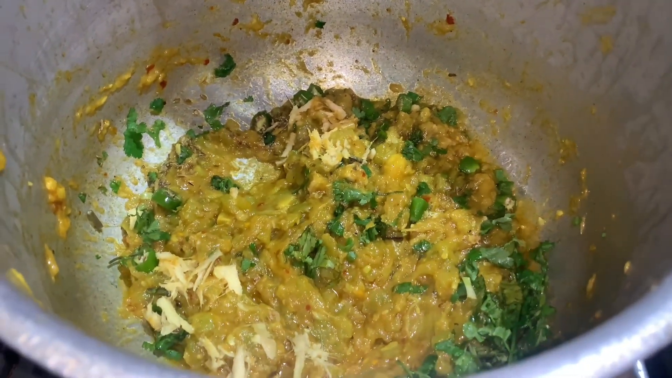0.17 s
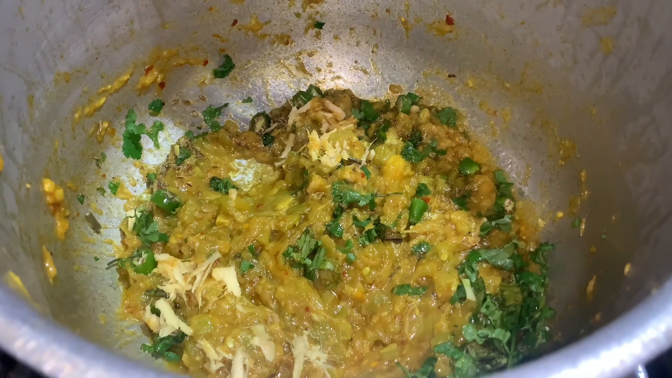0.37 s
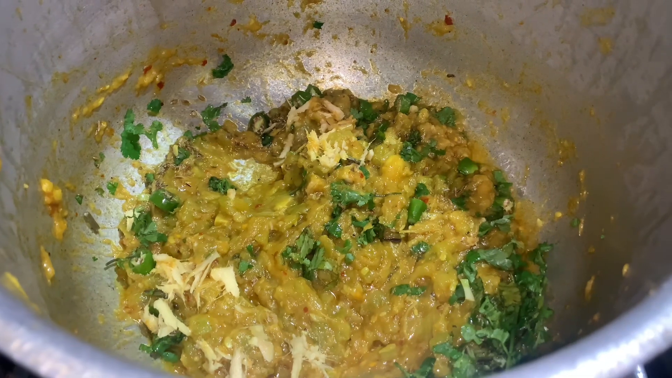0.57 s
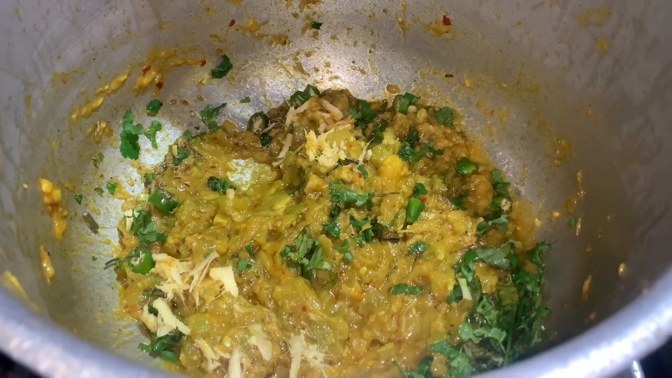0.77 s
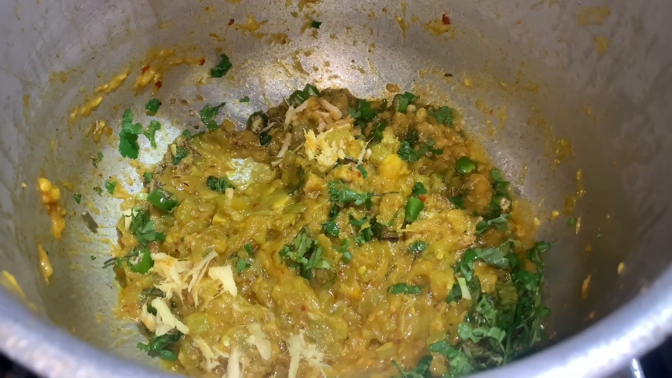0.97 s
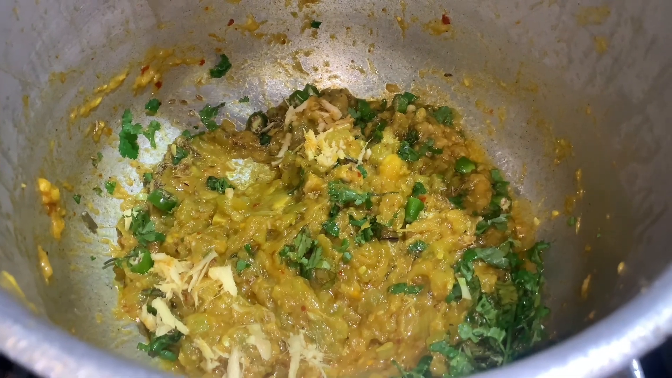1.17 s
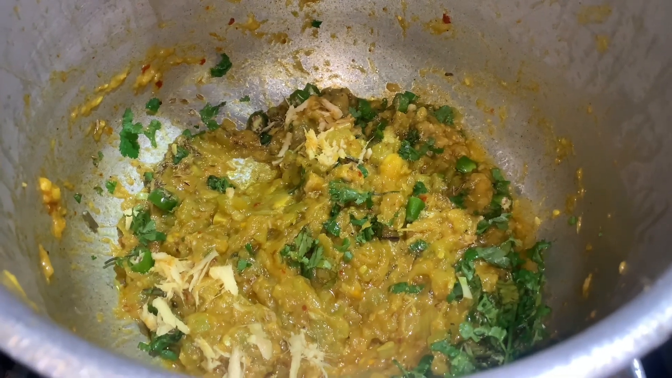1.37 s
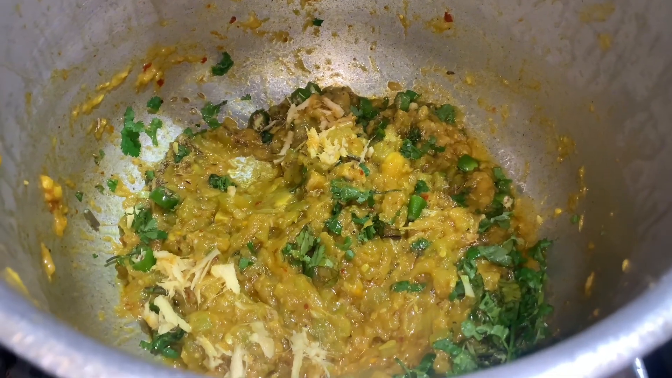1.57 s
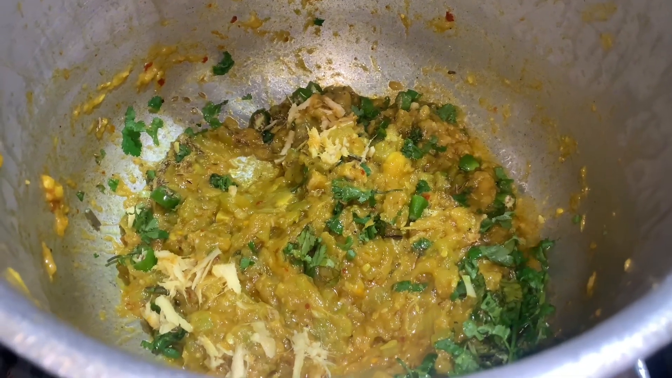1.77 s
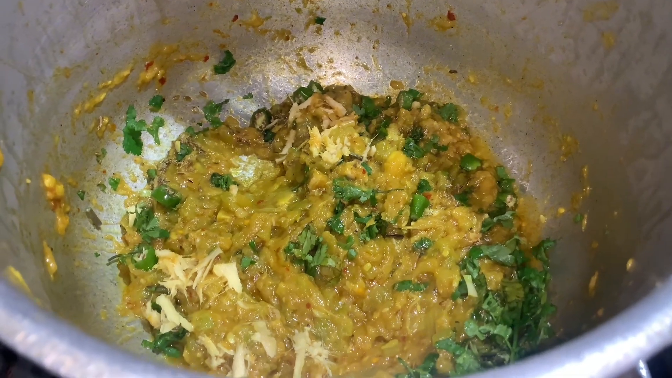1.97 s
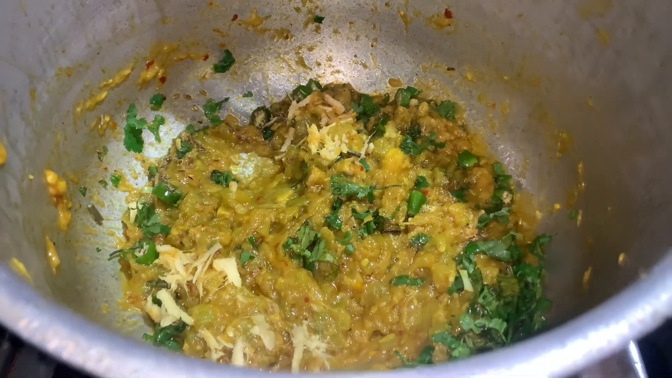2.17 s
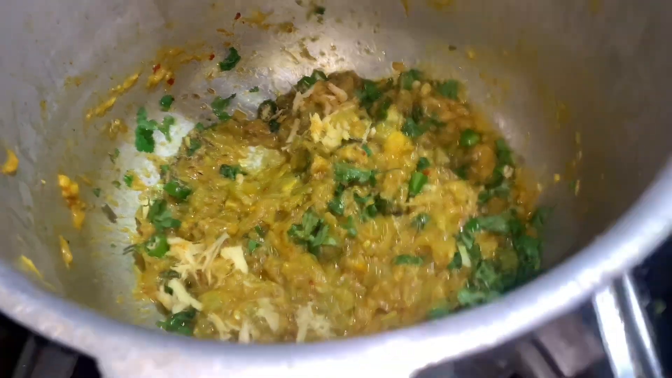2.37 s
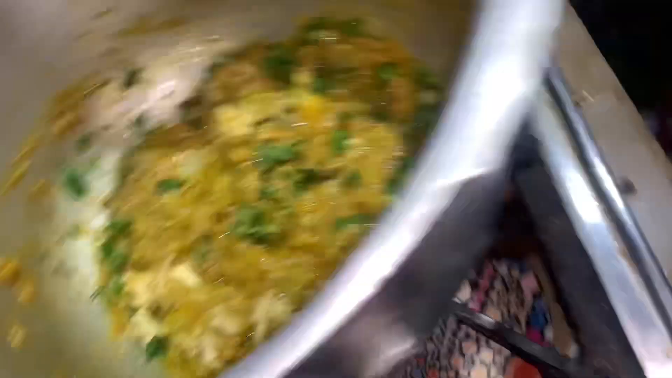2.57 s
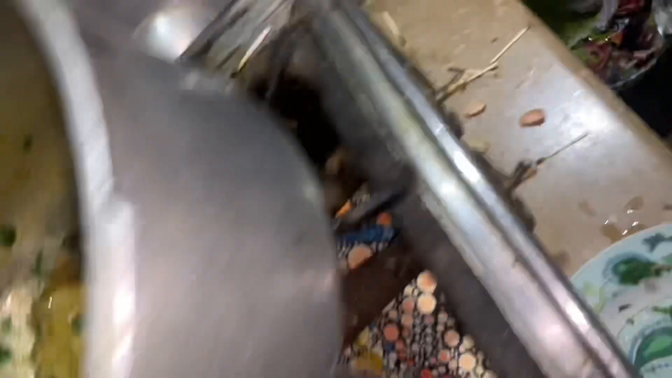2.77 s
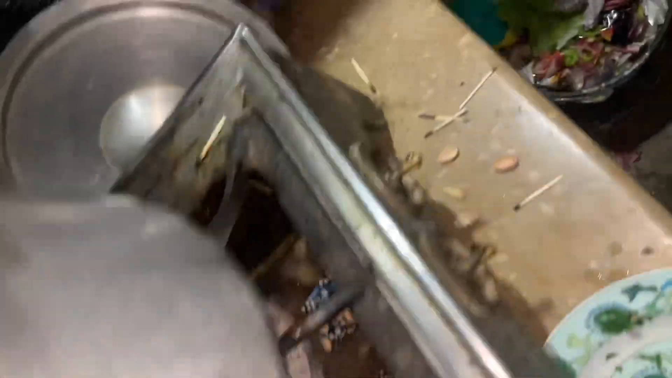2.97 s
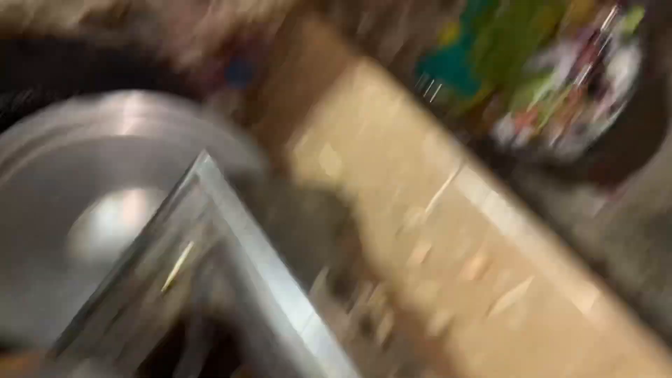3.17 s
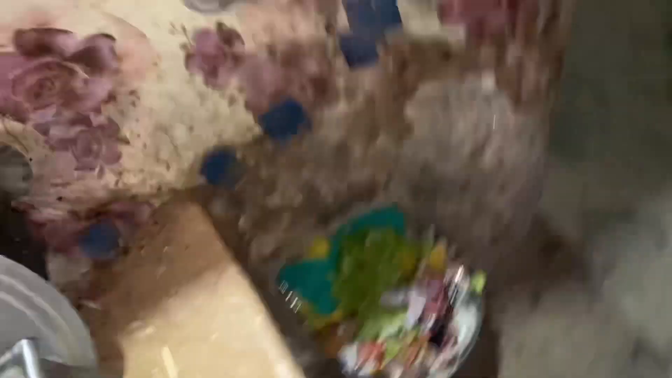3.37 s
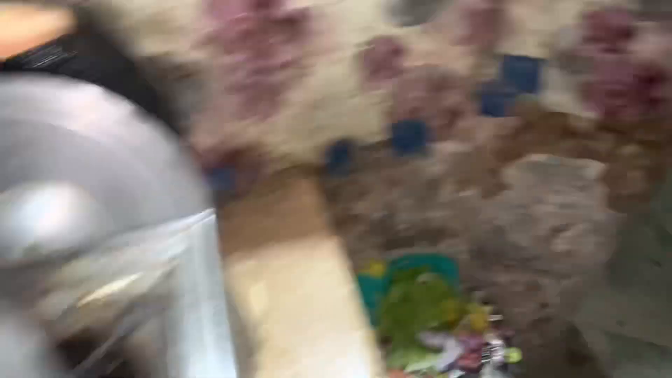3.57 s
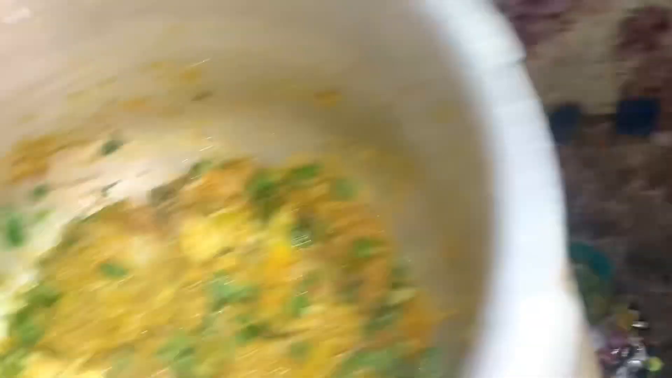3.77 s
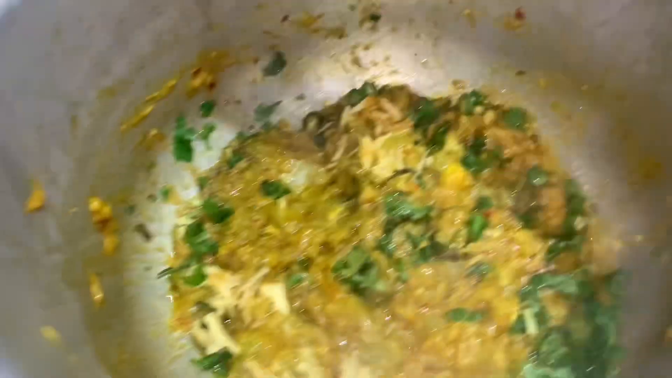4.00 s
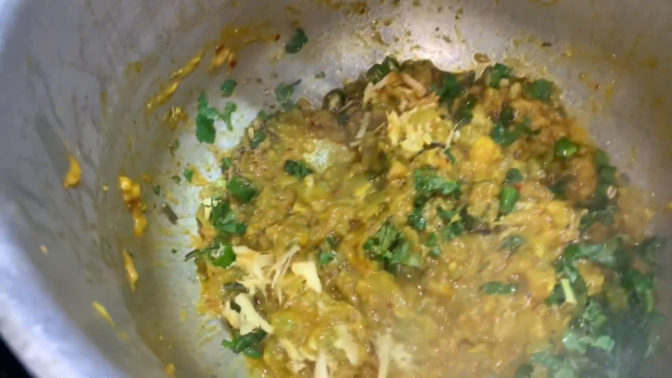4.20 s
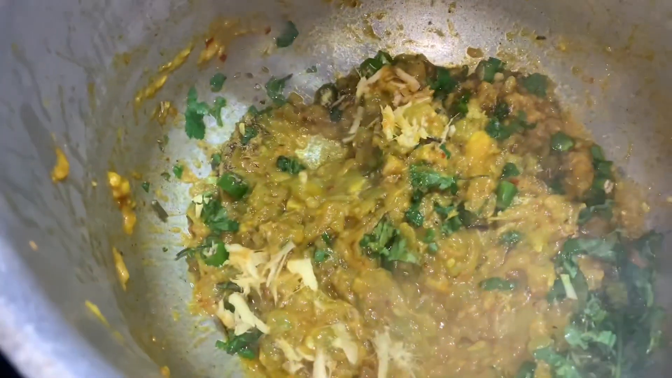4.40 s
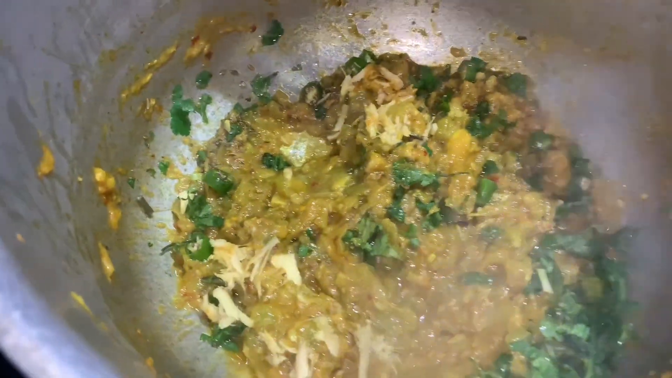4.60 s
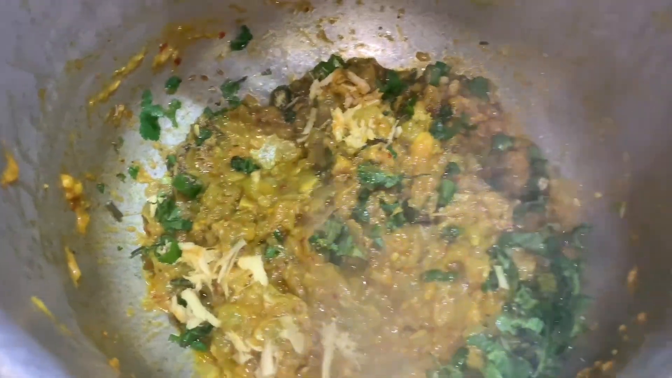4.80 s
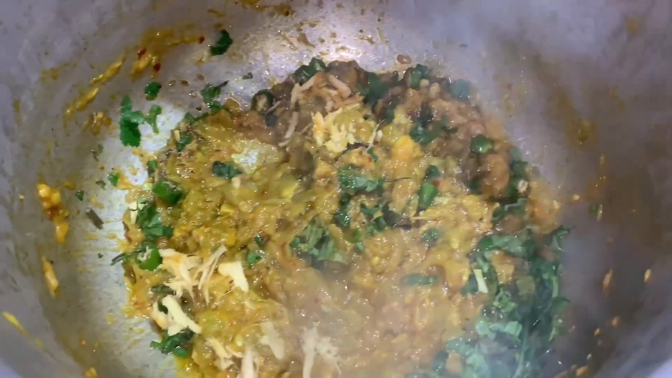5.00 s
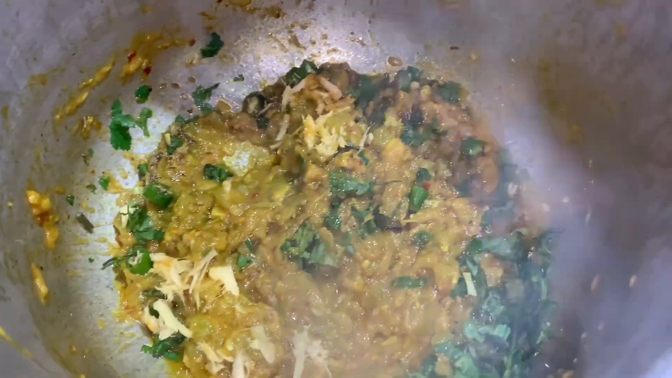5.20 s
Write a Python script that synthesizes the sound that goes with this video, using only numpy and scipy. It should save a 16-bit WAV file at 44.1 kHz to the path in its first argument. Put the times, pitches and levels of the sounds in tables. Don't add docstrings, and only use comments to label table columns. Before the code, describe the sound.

Bright, dense frying sizzle with sharp oil spits in a deep metal pot, dulling mid-way as the phone swings off, then returning slightly softer.

```python
import sys
import numpy as np
from scipy import signal
from scipy.fft import rfft, irfft
from scipy.io import wavfile
from scipy.ndimage import uniform_filter1d

SR = 44100
rng = np.random.default_rng(int(sys.argv[2]) if len(sys.argv) > 2 else 0)


def volts_from_db(level):
    exponent = np.asarray(level, float) / 20
    return 10 ** exponent


def inscribe(sig):
    pcm = np.round(np.clip(np.atleast_2d(sig).T, -1, 1) * 32767)
    wavfile.write(sys.argv[1], SR, pcm.astype(np.int16))


N = 231248
HOP, FRAME = 1024, 4096

# (time [s], level [dB])
VIEW_LOSS = [(0, 0), (0.5, -.5), (1.0, 0), (1.7, 0), (2.0, 0), (2.4, -2.5), (2.62, -4.5), (2.74, -6.5),
             (2.92, -11), (3.08, -12.5), (3.2, -16), (3.47, -16.5), (3.55, -11.5), (3.66, -7.5), (3.78, -4),
             (3.95, -3.5), (4.4, -3.5), (4.8, -4.5), (5.24, -6.5)]
# (frequency [Hz], level [dB])
FIZZ_COLOUR = [(3000, -33), (4500, -10), (5500, -9.5), (6500, -3), (8000, 0.5), (11000, 1.5), (13000, -1),
               (14500, 0.5), (15700, -4.5)]
# (frequency [Hz], level [dB])
WASH_COLOUR = [(200, -13.5), (500, -1.5), (750, -2.5), (1250, -2.5), (2000, 1.5), (3000, 1), (4500, 1),
               (5800, -6), (6800, -4), (8000, -10.5), (15500, -70)]
# (frequency [Hz], likeness [0 to 1])
PORT_LIKENESS = [(100, .985), (250, .96), (420, .9), (700, .6), (1000, .6), (1400, .3), (2200, .3),
                 (3200, .2), (6000, .2)]
# (frequency [Hz], left minus right [dB])
PORT_LEAN = [(60, 1), (120, 3), (240, -1.5), (480, 2), (950, 7), (1890, 3), (3770, 0), (7520, -11),
             (15000, 7)]
# (frequency [Hz], width [Hz], level [dB])
AIR_MODES = [(1000, 56, -1), (1538, 58, -5.5), (2066, 40, -5.5), (2540, 150, -7.5), (3080, 200, -12)]
# (time [s], pitch factor [ratio])
AIR_TUNING = [(0, 1.0), (2.4, 1.0), (3.7, .972), (5.24, .972)]
# (centre [s], length [s], peak over steady note [dB])
AIR_SURGES = [
    (0.66, 0.2, 4),
    (0.94, 0.12, 4.5),
    (1.47, 0.11, 0),
    (4.38, .3, -3),
    (4.72, .12, 0),
]
# (centre [s], length [s], peak [dB], pitch [Hz])
GAS_PUFFS = [(0.02, 0.22, -44.5, 98), (0.38, 0.28, -37.5, 104.4), (0.55, 0.19, -39.5, 109.6),
             (0.72, 0.16, -43, 103), (0.92, 0.35, -38, 105.5), (1.08, .16, -40, 103.4),
             (1.21, 0.23, -40.5, 103.6), (1.42, .2, -49, 101.6), (1.6, .3, -44.5, 99.5),
             (1.84, 0.12, -42, 109.9), (2.2, 0.29, -41, 105), (2.47, .2, -50, 103.2),
             (2.72, 0.33, -42.5, 101.7), (2.96, 0.24, -45, 104), (3.09, .16, -40.5, 104.3),
             (3.6, 0.33, -44, 92.5), (3.79, 0.16, -44.5, 104.5), (3.94, 0.076, -40.5, 93.1),
             (4.04, 0.087, -42.5, 91.7), (4.21, 0.23, -46, 105.8), (4.35, 0.11, -49, 111.8),
             (4.68, .36, -48.5, 102.9), (5.06, .2, -48, 103.6), (5.24, 0.088, -43.5, 108)]
# (centre [s], length [s], peak [dB])
HAND_THUDS = [(0.14, 0.11, -38), (0.41, 0.08, -36), (0.49, 0.11, -41.5), (0.68, 0.15, -44.5),
              (1.11, .1, -48), (1.4, 0.19, -41.5), (1.84, .36, -49.5), (3.17, 0.16, -49), (2.9, 0.15, -50),
              (3.6, 0.33, -49.5), (4.04, .08, -44), (4.45, 0.17, -45), (5.07, .14, -49.5)]
# (frequency [Hz], width [Hz], level [dB])
ROAR_MODES = [(305, 24, -1.5), (398, 22, 0), (432, 55, -5), (505, 40, -9)]
# (centre [s], length [s], peak over steady roar [dB])
ROAR_FLARES = [
    (0.12, 0.2, -1.5),
    (0.62, 0.087, 3),
    (1.7, 0.16, 3),
    (3.98, 0.39, 0),
    (4.22, 0.2, -1),
    (4.99, 0.11, 4.5),
    (5.21, .1, 6),
]
# (time [s], peak level [dB], centre frequency [Hz])
OIL_SPITS = [(0.2479, -20.5, 9600), (0.6017, -11.5, 10800), (0.701, -14.5, 10680), (0.7637, -21, 11800),
             (0.8193, -24.3, 11900), (0.8967, -30, 12150), (0.9292, -19, 11000), (0.948, -18.5, 9400),
             (1.2692, -23, 9700), (1.3392, -25.2, 12800), (1.4797, -16, 11150), (1.6934, -23, 10560),
             (1.7665, -18, 10370), (1.784, -12, 11800), (1.821, -16, 9590), (1.862, -17, 9590),
             (1.8925, -15, 11900), (2.0407, -13, 10400), (2.1404, -14, 11700), (2.2156, -24, 10900),
             (2.2337, -17, 12200), (2.2438, -22, 10540), (2.333, -16, 11250), (2.3607, -17, 10360),
             (2.412, -12.5, 11650), (2.676, -20, 12520), (3.8464, -18, 11380), (4.051, -20, 10940),
             (4.1467, -25, 9950), (5.1456, -23, 11900)]
# (time [s], peak level [dB], pitch [Hz], decay by 60 dB [s], tail level [dB])
COUNTER_KNOCKS = [
    (1.7790, -34, 6400, 0.037, 0.5),
    (1.7800, -37, 1334, 0.033, -8),
    (1.786, -29.5, 441, 0.036, -5.5),
    (1.786, -35, 308, 0.13, -8.5),
    (1.7877, -38, 920, 0.067, -14),
    (3.0330, -45.5, 857, 0.084, 2),
    (3.0335, -55, 1460, 0.14, 4),
    (3.0340, -55, 2190, 0.17, 6),
]
# (centre [s], length [s], peak level [dB])
ARM_SWINGS = [
    (3.24, 0.25, -52.5),
    (3.5, 0.36, -52),
]
STEREO_BANDS = [120, 132, 144, 160, 176, 196, 216, 240, 264, 292, *range(320, 769, 32)]


def evened(x):
    return x / np.sqrt(np.mean(x ** 2) + 1e-20)


def read(points, hz):
    f, value = np.transpose(points)
    return np.interp(np.log(hz + 1), np.log(f + 1), value)


def column(rows, count, t):
    rows = np.asarray(rows)
    return np.interp(t, rows[:, 0], rows[:, count])


def add(mix, s, sound):
    part = mix[..., round(s * SR):][..., :sound.shape[-1]]
    part += sound[..., :part.shape[-1]]


def drift(rate_hz):
    lowpass = signal.butter(2, rate_hz, fs=SR, output="sos")
    return evened(signal.sosfilt(lowpass, rng.standard_normal(N)))


def heard(full_db, share, t):
    return full_db + share * column(VIEW_LOSS, count=1, t=t)


def swells(rows, idle_db):
    t = np.arange(N) / SR
    power = volts_from_db(2 * idle_db)
    for centre, length, db, *_ in rows:
        bump = volts_from_db(db) * np.cos(np.pi * np.clip((t - centre) / length, -.5, .5))
        power = power + bump ** 2
    return np.sqrt(power)


def steadied(x, size):
    power = uniform_filter1d((x ** 2).mean(axis=0), size=size)
    return x / np.sqrt(abs(power) + .05)


def peaks(modes, hz, tuning=1.):
    return sum(volts_from_db(2 * db) / (1 + (2 * (hz - f * tuning) / width) ** 2) ** 1.484 for f, width, db in modes)


def diffuse(shape, patchy_db):
    frames, hz = N // HOP + 5, np.fft.rfftfreq(FRAME, 1 / SR)[:, None]
    a, b, c, d, patches = rng.standard_normal((frames, len(hz), 5)).T
    patches = uniform_filter1d(patches, size=30, axis=0)
    patches = evened(uniform_filter1d(patches, size=3, axis=1))
    same = np.clip(read(PORT_LIKENESS, hz), 0, 1)
    left = a + 1j * b
    shared = same * left * np.exp(-2j * np.pi * hz * 0.00015)
    right = shared + np.sqrt(1 - same ** 2) * (c + 1j * d)
    lean = volts_from_db(read(PORT_LEAN, hz) / 2)
    t = np.arange(frames) * HOP / SR
    z = np.array([left * lean, right / lean]) * shape(hz, t) * volts_from_db(patchy_db * patches)
    return evened(signal.istft(z, nperseg=FRAME, noverlap=FRAME - HOP)[1][:, :N])


def fizz():
    t, hz = np.arange(N) / SR, np.fft.rfftfreq(N, 1 / SR)
    bursts = np.zeros(N // 2 + 1, complex)
    classes = [np.exp(-(np.log((hz + 1) / f) / 0.36) ** 2) for f in (7500, 10500, 14000)]
    for colour in classes:
        size = volts_from_db(4.1 * np.minimum(rng.exponential(1, N), 4.5) + 0.77 * drift(rate_hz=25))
        struck = rng.random(N) < 9000 / SR
        clicks = size * rng.choice([-1., 1.], N) * struck
        bursts += rfft(evened(clicks)) * colour
    flat = np.sqrt(sum(c ** 2 for c in classes)) + 0.0011
    bed = evened(irfft(bursts / flat * volts_from_db(read(FIZZ_COLOUR, hz)), N))
    bed = bed * volts_from_db(heard(-31.5, share=1.0, t=t)) + spits()
    left_lag_s = 0.0002157
    late = irfft(rfft(bed) * np.exp(-2j * np.pi * hz * left_lag_s), N)
    return np.array([late, bed])


def wash():
    t = np.arange(N) / SR
    shade_s = 0.11
    before, after = heard(-41.5, share=0.5, t=t - shade_s), heard(-41.5, share=0.5, t=t + shade_s)
    level_db = np.minimum(before, after) + 0.8 * drift(rate_hz=23)

    def colour(hz, t):
        shade_db = 0.31 * column(VIEW_LOSS, count=1, t=t - .05) / (1 + (hz / 1600) ** 4)
        return volts_from_db(read(WASH_COLOUR, hz) + shade_db)

    return volts_from_db(level_db) * diffuse(colour, patchy_db=0.9)


def ringing_air():
    notes = diffuse(lambda hz, t: np.sqrt(peaks(AIR_MODES, hz, column(AIR_TUNING, count=1, t=t))), patchy_db=-1.1)
    gain = volts_from_db(heard(-46.5, share=0.93, t=np.arange(N) / SR)) * swells(AIR_SURGES, idle_db=0.5)
    return gain * steadied(notes, size=8000)


def flame():
    t = np.arange(N) / SR
    turns = np.cumsum(column(GAS_PUFFS, count=3, t=t) + 2.5 * drift(rate_hz=15)) / SR
    hum = np.sqrt(2) * np.sin(2 * np.pi * turns)
    hum = hum * swells(GAS_PUFFS, idle_db=-61.5) * volts_from_db(1.2 * drift(rate_hz=13))

    upper_modes = [(138.3, 30.4, 3.5), (98, 42, -1.0), (208.0, 35, -17.5)]  # (Hz, width Hz, dB)
    upper = diffuse(lambda hz, t: np.sqrt(peaks(upper_modes, hz)), patchy_db=-1)
    upper = steadied(upper, size=12000) * volts_from_db(heard(-47, share=.45, t=t))

    deep = diffuse(lambda hz, t: np.sqrt(peaks([(56.0, 106, 0)], hz)) * hz / (hz + 25), patchy_db=2.5)
    rumble = steadied(deep, size=4000) * swells(HAND_THUDS, heard(-51, share=0.15, t=t))

    roar = diffuse(lambda hz, t: np.sqrt(peaks(ROAR_MODES, hz)), patchy_db=0.5)
    lag_s = 0.087
    roar = steadied(roar, size=8000) * swells(ROAR_FLARES, idle_db=0)
    roar = roar * volts_from_db(heard(-47.5, share=0.8, t=t - lag_s))
    return hum * volts_from_db([[.4], [-.4]]) + rumble + upper + roar


def spits():
    out, u = np.zeros(N), np.arange(-44, 45) / SR
    for (s, db, f), puff in zip(OIL_SPITS, rng.standard_normal((len(OIL_SPITS), 89))):
        hiss = np.gradient(np.diff(puff, prepend=0))
        ring = evened(np.sin(2 * np.pi * f * u) + 1.2 * hiss)
        add(out, s + u[0], volts_from_db(db - 3.0) * np.exp(-(u / 0.00042) ** 2) * ring)
    return out


def knocks():
    out, u = np.zeros((2, N)), np.arange(6000) / SR
    puffs = rng.standard_normal((len(COUNTER_KNOCKS), 3, 6000))
    for (s, db, hz, t60, tail_db), puff in zip(COUNTER_KNOCKS, puffs):
        band = signal.butter(2, [.75 * hz, 1.4 * hz], "bandpass", fs=SR, output="sos")
        tail = evened(signal.sosfilt(band, puff[0] + 3.2 * puff[1:]))
        tail = tail * volts_from_db(tail_db - 60 * u / (2.8 * t60))
        ring = np.sin(2 * np.pi * hz * u) * volts_from_db(np.array([[2.5], [-2.5]]) - 60 * u / t60)
        onset = np.minimum(u / .001, 1)
        add(out, s, volts_from_db(db) * onset * (ring + tail))
    return out


def swing():
    slow_hz, fast_hz = 160, 182
    drag = swells(ARM_SWINGS, idle_db=-90)
    pitch = slow_hz + (fast_hz - slow_hz) * drag / drag.max()
    times = np.arange(N) / SR
    moan = diffuse(lambda hz, t: np.sqrt(peaks([(1, 160, 0)], hz, np.interp(t, times, pitch))), patchy_db=0)
    return steadied(moan, size=3000) * drag


def scene():
    return fizz() + wash() + ringing_air() + flame() + knocks() + swing()


def joint_stereo(x, margin_db, wobble_db, grit, masked_db):
    pad = 601
    both = np.pad([x[0] + x[1], x[0] - x[1]], ((0, 0), (pad, 0)))
    how = dict(window="cosine", nperseg=2048, noverlap=1024)
    z = signal.stft(both, **how)[2]
    error = np.exp(2j * np.pi * rng.random(z.shape[::-1]).T)
    luck = rng.standard_normal((z.shape[2], len(STEREO_BANDS) - 1)).T
    for lo, hi, chance in zip(STEREO_BANDS, STEREO_BANDS[1:], luck):
        power = (abs(z[:, lo:hi]) ** 2).mean(axis=1, keepdims=True)
        allowed_db = np.maximum(margin_db - lo / 300 + wobble_db * chance, 0)
        kept = power * volts_from_db(2 * allowed_db) > power[::-1]
        rough = z[:, lo:hi] + grit * np.sqrt(power) * error[:, lo:hi]
        z[:, lo:hi] = kept * rough / np.sqrt(1 + grit ** 2 / 2)
    treble = (abs(z[:, 350:700]) ** 2).mean(axis=(0, 1))
    for lo in range(104, 296, 8):
        power = (abs(z[:, lo:lo + 8]) ** 2).mean(axis=1, keepdims=True)
        z[:, lo:lo + 8] *= power > treble * volts_from_db(2 * masked_db)
    mid, side = signal.istft(z, **how)[1][:, pad:pad + N]
    return np.array([mid + side, mid - side]) / 2


def low_pass(x):
    return signal.sosfilt(signal.butter(12, 16500, fs=SR, output="sos"), x)


def record(dry):
    cut = signal.sosfilt(signal.butter(3, 24, "highpass", fs=SR, output="sos"), dry)
    thin = joint_stereo(cut, margin_db=8.2, wobble_db=1.9, grit=.9, masked_db=-12.8)
    top_cut = signal.firwin(1023, 15740, window=("kaiser", 11), fs=SR)
    mix = signal.oaconvolve(thin, top_cut[None], "same")
    return low_pass(mix)


dry = scene()
out = record(dry)
inscribe(out)
```